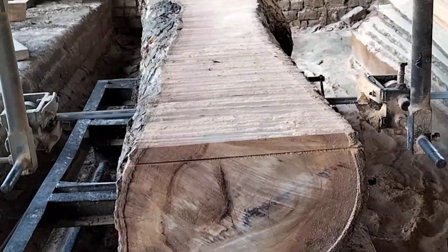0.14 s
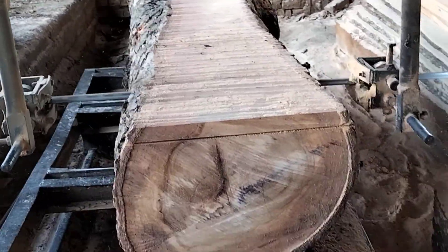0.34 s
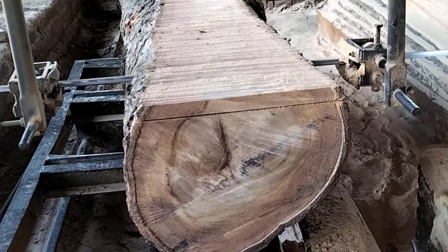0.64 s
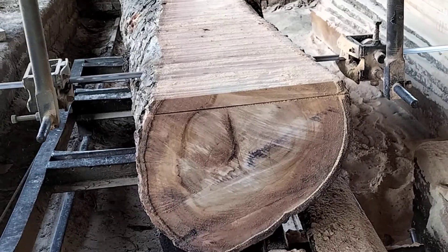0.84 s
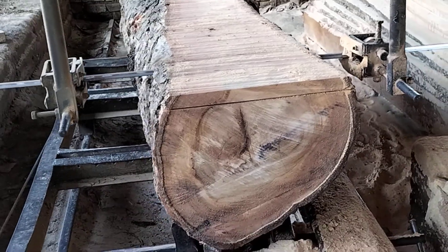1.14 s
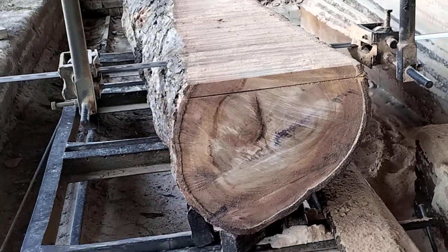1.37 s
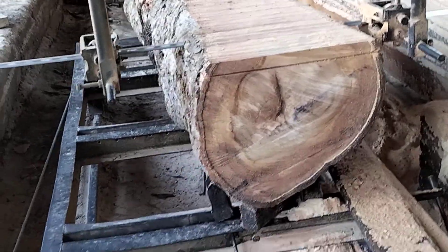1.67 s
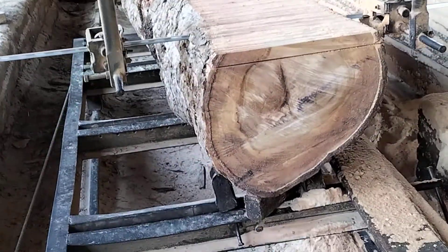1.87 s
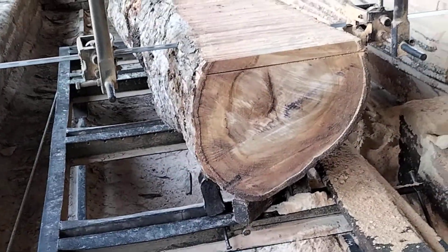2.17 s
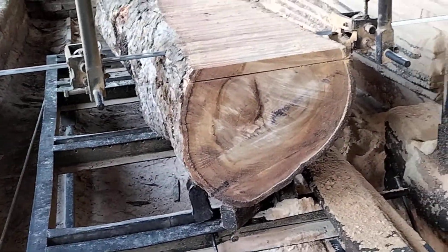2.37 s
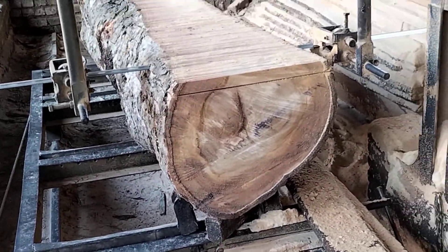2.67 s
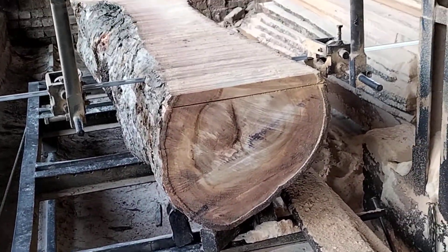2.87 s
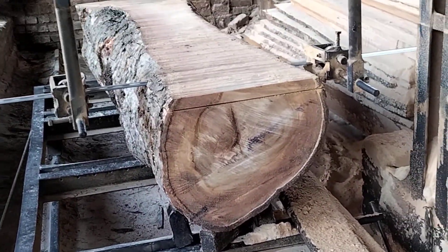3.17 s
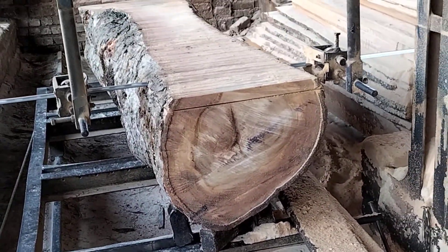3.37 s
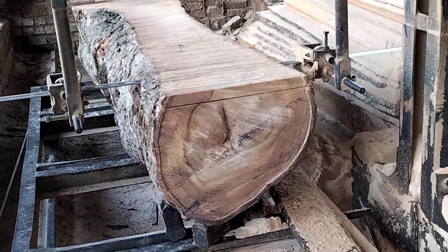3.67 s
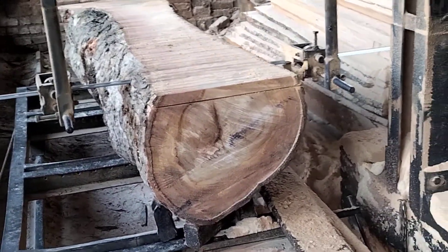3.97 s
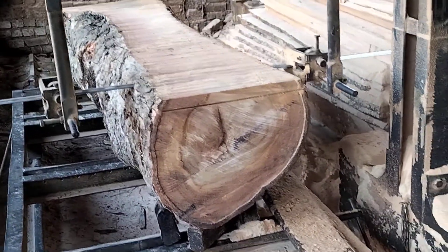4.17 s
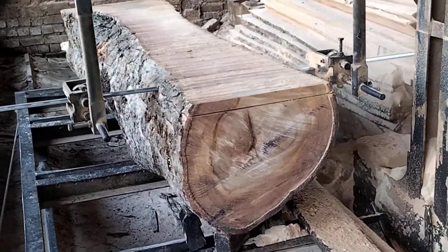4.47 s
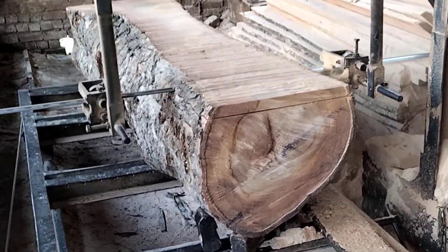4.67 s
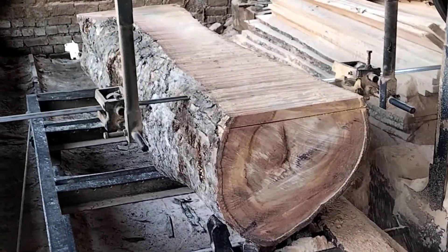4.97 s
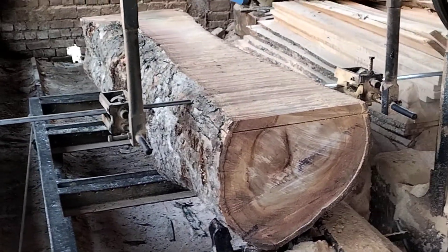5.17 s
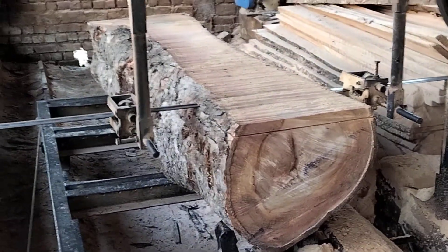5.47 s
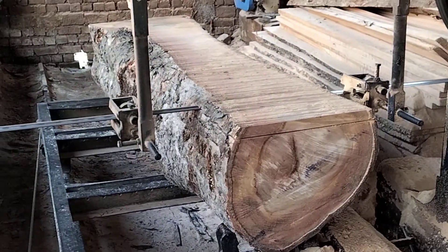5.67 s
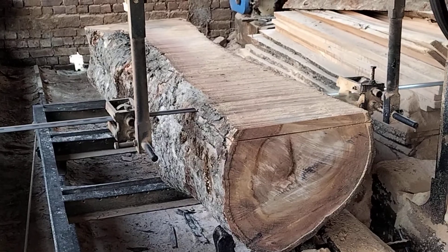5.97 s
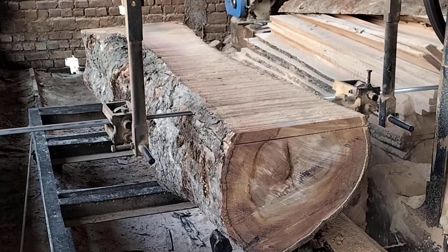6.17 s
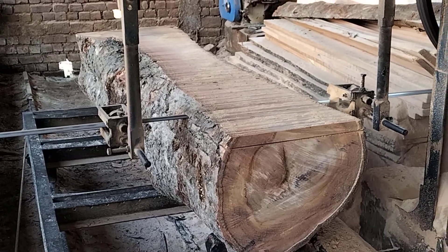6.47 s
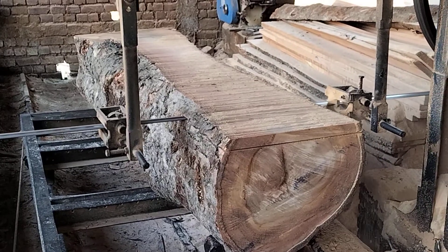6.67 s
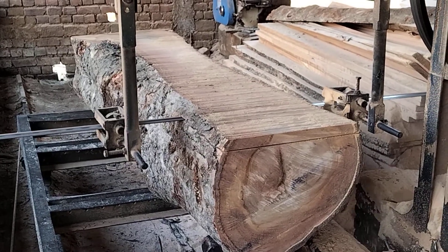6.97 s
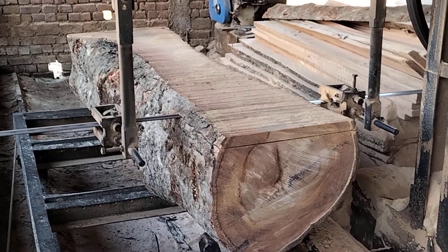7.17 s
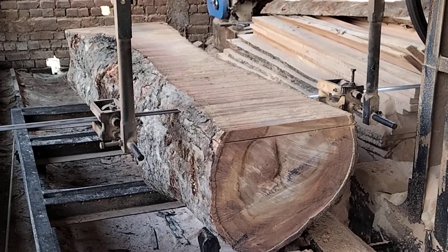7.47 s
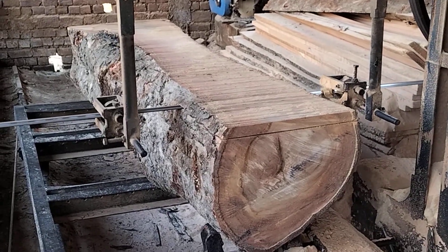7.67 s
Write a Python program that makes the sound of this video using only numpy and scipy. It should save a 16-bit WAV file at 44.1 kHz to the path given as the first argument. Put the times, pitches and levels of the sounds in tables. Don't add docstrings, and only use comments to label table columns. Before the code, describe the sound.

Close, dry sound of a running band saw cutting wood, heard from a few steps away on one hand-held microphone. The noise is already full at the start and never stops: rough tearing, metallic whine shifting in strength, airy hiss, low hum. Singing blade tones swell and fade; late on, a quick wooden clatter of several taps breaks through, and the sawing carries on to the end.

```python
import sys
import numpy as np
from scipy import signal
from scipy.io import wavfile

SR = 44100
rng = np.random.default_rng(int(sys.argv[2]) if len(sys.argv) > 2 else 0)


def int16_out(signal):
    q = np.round(np.clip(np.atleast_2d(signal).T, -1, 1) * 32767)
    wavfile.write(sys.argv[1], SR, q.astype(np.int16))


def convert_level_to_amplitude(level_db):
    exponent = np.asarray(level_db, float) / 20
    return 10 ** exponent


N = 344862


def rms_one(x):
    return x / np.sqrt(np.mean(x ** 2) + 1e-20)


def in_time(rows):
    s, *columns = np.transpose(rows)
    return [np.interp(np.arange(N) / SR, s, column) for column in columns]


def drift(rate):
    r = np.exp(-200 * np.pi * rate / SR)
    noise = rng.standard_normal(N // 100 + 1002)
    slow = signal.lfilter([1], [1, -2 * r, r * r], noise)[1000:]
    return np.interp(np.arange(N) / 100, np.arange(len(slow)), rms_one(slow - slow.mean()))


def resonate(x, hz, width):
    r = np.exp(-np.pi * width / SR)
    poles = [1, -2 * r * np.cos(2 * np.pi * hz / SR), r * r]
    return signal.lfilter([(1 - r * r) / 2, 0, (r * r - 1) / 2], poles, x)


def band_pass(x, order, low_hz, high_hz):
    return signal.sosfilt(signal.butter(order, [low_hz, high_hz], "band", fs=SR, output="sos"), x)


def elsewhere(x):
    return np.roll(x, rng.integers(N))


def family(force, low_hz, high_hz, width, fall_db, share_db, flutter_db, count=10):
    out = np.zeros(N)
    for place in np.linspace(0, 1, count):
        hz = np.sqrt(low_hz ** 2 + (high_hz ** 2 - low_hz ** 2) * place ** 1.31)
        wide = width * (0.76 + place)
        ring = resonate(resonate(elsewhere(force), hz, wide), hz, 0.99 * wide)
        flutter = flutter_db * (drift(2.9) + 0.63 * drift(8.2))
        out += ring * convert_level_to_amplitude(fall_db * abs(place - 0.15) + flutter)
    return convert_level_to_amplitude(share_db) * rms_one(out)


def banded(force, spectrum, low_hz, high_hz, patchy_db, count):
    hz, level_db = np.transpose(spectrum)
    edges, out = np.geomspace(low_hz, high_hz, count + 1), np.zeros(N)
    for low, high in zip(edges, edges[1:]):
        middle_db = np.interp(np.log(low * high) / 2, np.log(hz), level_db)
        patches = patchy_db * (drift(1.22) + 0.83 * drift(12.4))
        out += band_pass(elsewhere(force), 2, low, high) * convert_level_to_amplitude(middle_db + patches)
    return rms_one(out)


# time in seconds, view of the strip in dB.
VIEW = [(0, 2.5), (1.65, 3.5), (2.0, 2), (3.4, 0.5), (4.5, -2), (4.8, 1), (5.1, -3), (6.0, -2), (6.35, 0),
        (7.4, -5), (7.82, -2.5)]
# time in seconds, bite in dB.
BITE = [(0, 2), (0.55, 2), (1.1, 0.5), (1.75, -2), (2.15, 1), (2.9, -1), (3.25, 0.4), (3.6, -2.5),
        (4.35, -1.7), (4.85, -5), (5.25, 4), (6.0, 3), (6.55, -3), (6.85, -2), (7.15, 2.6), (7.45, 0),
        (7.82, 2.6)]
# time in seconds, bow in dB.
BOWING = [(0, -3), (0.35, 1.5), (0.62, 3.5), (0.95, 2), (1.3, 0.5), (1.7, -4.5), (2.0, 0), (2.45, 0.5),
          (2.8, -1.2), (3.15, -4.5), (4.05, 0.8), (4.3, -1), (4.75, -0.5), (5.0, 1.2), (5.9, 3), (6.3, 5),
          (7.0, -1), (7.5, -3.5)]
# time in seconds, freedom in dB.
FREEDOM = [(0, -1), (0.3, 1), (0.5, -2), (0.9, 1.5), (1.15, 0.5), (1.7, 1), (2.0, 0), (2.2, 0), (2.5, 0),
           (2.75, 0.5), (3.4, 0.5), (3.58, -2.5), (4.0, -1.5), (4.3, 0), (4.6, -1), (6.3, -0.5), (6.55, -2),
           (7.82, -1)]
LAYER_ANSWERS = {"twist": (-32, 0.26, -0.3, -0.22, -0.3), "first bend": (-28.5, 0.02, -0.1, 0.1, 1.56),
                 "second bend": (-33, 1.5, 0.1, -0.1, -0.1), "fourth bend": (-48.5, 0, -0.5, 0.05, 0.8),
                 "low modes": (-34.5, 1, -2.7, 1.7, 0.7), "middle modes": (-31, 0.45, 0.9, 1, -0.9),
                 "high modes": (-34.5, 1, 1.1, -0.14, -0.3), "squeal": (-28, -0.8, 0.7, -0.24, 1),
                 "rasp": (-28, -0.15, 0.1, -0.22, -0.09), "sawdust": (-31.5, -0.02, -0.11, 0.02, 0.07),
                 "guides": (-48.5, 0.56, 0.1, -0.1, -0.3), "frame": (-35.5, -0.2, -0.1, -0.22, -0.1)}


def level(name):
    mean_db, *shares = LAYER_ANSWERS[name]
    controls = [in_time(rows)[0] for rows in (VIEW, BITE, BOWING, FREEDOM)]
    return convert_level_to_amplitude(mean_db + np.dot(shares, controls))


def teeth(per_s, spread_db):
    hardness = np.minimum(rng.exponential(1, N), 5)
    sizes = convert_level_to_amplitude(spread_db * hardness) * rng.choice([-1, 1], N)
    return rms_one(sizes * (rng.random(N) < per_s / SR))


# frequency in Hz, density in dB per Hz.
RASP_SPECTRUM = [(24, -70), (40, -37), (175, -10), (246, -4), (318, -9.5), (556, -10), (916, -7.5),
                 (1120, -10.5), (1630, -4.5), (1800, -8.5), (2070, 0), (2640, 0.5), (3930, -3),
                 (4430, -35.5), (4700, -14), (6110, -54), (10300, -120)]
# lowest in Hz, highest in Hz, width of a mode in Hz,
# fall over the family in dB, share in dB, flutter in dB.
PLATE_MODES = (2955.5, 4160.5, 27, -2.5, -6, 4.5)


def rasp(force):
    torn = convert_level_to_amplitude(3.5) * banded(force, RASP_SPECTRUM, 45.5, 4720, patchy_db=0.94, count=32)
    return level("rasp") * (torn + family(force, *PLATE_MODES, count=22))


# lowest in Hz, highest in Hz,
# width of a mode in Hz, fall over the family in dB, share in dB, flutter in dB.
STRIP_FAMILIES = [(977, 1300, 58, 4, -2.5, 2.5), (1770, 1950, 35, -8.5, 1, 3),
                  (4835, 5400, 88, -6, -1, 2.6), (14500, 16100, 330, -.5, 2.5, 1.1)]


def strip(force):
    names = ["twist", "first bend", "second bend", "fourth bend"]
    return sum(level(name) * family(force, *row) for name, row in zip(names, STRIP_FAMILIES))


# lowest in Hz, highest in Hz,
# width of a mode in Hz, fall over the family in dB, share in dB, flutter in dB.
SPAN_FAMILIES = [(1349, 1640, 37, -2, -8.5, -1), (1993, 2270, 20, -8.5, -5, 2.5),
                 (5490, 5980, 410, 0, -1.5, 1.5)]


def span(force):
    names = ["low modes", "middle modes", "high modes"]
    return sum(level(name) * family(force, *row, count=7) for name, row in zip(names, SPAN_FAMILIES))


def moving_resonance(force, centre_hz, width):
    slow = signal.butter(2, width / 2, fs=SR, output="sos")
    along, across = (signal.sosfilt(slow, elsewhere(force)) for part in "ab")
    phase = 2 * np.pi * np.cumsum(centre_hz) / SR
    return rms_one(along * np.cos(phase) + across * np.sin(phase))


# width in Hz, share in dB.
SQUEAL_PARTS = [(90, -9.5), (300, -4)]


def squeal(force):
    start_hz, settled_hz, settle_s, sag_hz_per_db = 2430, 2642, 0.9, 16
    settling = np.exp(-np.arange(N) / SR / settle_s)
    pitch_hz = settled_hz + (start_hz - settled_hz) * settling - sag_hz_per_db * in_time(BITE)[0]
    out = np.zeros(N)
    for width, share_db in SQUEAL_PARTS:
        swell = convert_level_to_amplitude(share_db + 1.6 * drift(10.0))
        out += swell * moving_resonance(force, pitch_hz + 45 * drift(5), width)
    return level("squeal") * out


# middle in seconds, frequency in Hz, level in dB, half length in seconds.
SINGING_MODES = [(0.068, 2430.0, -32, 0.15), (0.142, 3880.0, -38, 0.2), (0.2, 1135.0, -39.5, 0.63),
                 (0.3, 2400.0, -32, 0.3), (0.4, 5000.0, -36.0, 0.09), (0.43, 3190.0, -35.5, 0.15),
                 (0.55, 2060.0, -28, 0.093), (0.64, 2670.0, -30.5, 0.08), (0.667, 2020.0, -28.5, 0.31),
                 (1.04, 3190.0, -38, 0.38), (1.096, 2670.0, -34.5, 0.13), (1.28, 2130.0, -30.5, 0.16),
                 (1.56, 2690.0, -31.5, 0.16), (1.58, 3500.0, -32.5, 0.17), (1.745, 1790.0, -27, 0.054),
                 (2.1, 2610.0, -31, 0.16), (2.25, 4970.0, -36, 0.14), (2.3, 2760.0, -30.5, 0.099),
                 (2.563, 1810.0, -29, 0.2), (3.097, 1830.0, -34, 0.69), (3.324, 2280.0, -36.5, 0.24),
                 (3.758, 1830.0, -35, 0.36), (4.82, 1330.0, -38, 0.12), (5.356, 2630.0, -34, 0.59),
                 (5.665, 2540.0, -29, 0.12), (6.063, 2610.0, -28, 0.17), (6.145, 2240.0, -32.0, 0.17),
                 (6.41, 1755, -36, 0.1), (7.361, 1135.0, -37, 0.12), (7.58, 2630.0, -32.5, 0.16)]


def streaks():
    out, t = np.zeros(N), np.arange(N) / SR
    waver, tremble = np.cumsum(drift(13.25)) / SR, convert_level_to_amplitude(5.15 * drift(23))
    for s, hz, db, length in SINGING_MODES:
        near = slice(max(round((s - length) * SR), 0), round((s + length) * SR))
        swell = np.cos(np.pi / 2 * (t[near] - s) / length) ** 2
        tone = np.sin(2 * np.pi * (hz * t[near] + 18 * elsewhere(waver)[near]))
        out[near] += convert_level_to_amplitude(db + 4.5) * swell * elsewhere(tremble)[near] * tone
    return out


# frequency in Hz, density in dB per Hz.
DUST_SPECTRUM = [(2530, -36), (4300, 1.5), (4570, 0.5), (4990, 0), (6450, -2), (7140, 3), (8040, -6),
                 (9250, -21.5), (9700, -22), (12600, -56), (21300, -120)]


def sawdust(force):
    hiss = banded(force, DUST_SPECTRUM, 4264, 9720, patchy_db=0.66, count=16)
    return level("sawdust") * convert_level_to_amplitude(2.0) * hiss


# frequency in Hz, density in dB per Hz.
GUIDE_SPECTRUM = [(5470, -36), (9300, -11.5), (10100, 2), (11100, -3), (11900, 3), (13200, -6), (13800, -5),
                  (14600, 1)]


def guides(force):
    chatter = convert_level_to_amplitude(0.52 * drift(19))
    sizzle = banded(force, GUIDE_SPECTRUM, 9580, 14740, patchy_db=-1.5, count=14)
    return level("guides") * convert_level_to_amplitude(1.54) * chatter * sizzle


# time in seconds, peak in dB.
BOUNCES = [
    (7.436, -23.5),
    (7.445, -19),
    (7.452, -17),
    (7.466, -21.5),
    (7.478, -23),
]
# frequency in Hz, level in dB, time to fall by 60 dB in seconds.
BOARD_MODES = [(278, -1, 0.098), (364, -11, 0.065), (463, -6, 0.078), (564, -12, 0.05), (643, 2, 0.078),
               (710, -3.5, 0.08), (798, 6.5, 0.059), (935, -1, 0.067), (1064, 0, 0.086)]


def board():
    at, out = [round(s * SR) for s, db in BOUNCES], np.zeros(N)
    peaks_db = np.array(BOUNCES)[:, 1]
    for hz, level_db, t60 in BOARD_MODES:
        clicks = np.full(N, 1e-18)
        strengths = convert_level_to_amplitude(peaks_db + level_db - 7.5 + rng.normal(0, 2.2, len(at)))
        clicks[at] = strengths * rng.choice([-1, 1], len(at))
        r, w = convert_level_to_amplitude(-60 / (t60 * SR)), 2 * np.pi * hz / SR
        out += signal.lfilter([0, np.sin(w)], [1, -2 * r * np.cos(w), r * r], clicks)
    return signal.sosfilt(signal.butter(4, 190, "high", fs=SR, output="sos"), out)


# frequency in Hz, width in Hz, level in dB.
FRAME_PANELS = [(137.5, 13.5, -13.5), (155.4, 17, -11), (210, 31, -26.5), (243.4, 31, 1), (356.8, 21, -8)]


def frame(force):
    wheel_hz = 11.8
    turns = np.cumsum(wheel_hz * (1 + 0.01994 * drift(1.192)) / SR)
    thumps = rms_one(np.diff(np.floor(turns), prepend=0))
    shake = force + 0.43 * thumps
    rings = (convert_level_to_amplitude(db) * resonate(resonate(shake, hz, width), hz, 2.5 * width) for hz, width, db in FRAME_PANELS)
    return level("frame") * rms_one(sum(rings))


# middle in seconds, level in dB.
AIR_PUFFS = [
    (0.05, -64),
    (1.05, -72),
    (2.6, -71),
    (3.64, -68),
    (4.83, -65),
    (6.72, -71),
    (7.65, -70),
]


def draught():
    still_db, puff_s = -79, 0.13
    t = np.arange(N) / SR
    swells = sum(convert_level_to_amplitude(db) * np.exp(-((t - s) / puff_s) ** 2) for s, db in AIR_PUFFS)
    rumble = rms_one(band_pass(rng.standard_normal(N), 2, 27, 55))
    return convert_level_to_amplitude(-2.0) * (convert_level_to_amplitude(still_db) + swells) * rumble


def scene():
    force = teeth(9000, spread_db=2.5)
    shudder = convert_level_to_amplitude(0.48 * drift(10.5))
    saw = rasp(force) + strip(force) + span(force) + squeal(force) + sawdust(force) + guides(force)
    mono = shudder * saw + streaks() + board() + frame(elsewhere(force)) + draught()
    return np.array([mono, mono])


# middle in seconds, lowest in Hz, highest in Hz.
SIDE_PATCHES = [
    (1.247, 6850, 8900),
    (1.387, 8950, 11700),
    (4.684, 8950, 10350),
    (5.451, 4150, 5150),
    (5.520, 4650, 5700),
    (6.519, 4650, 6200),
    (6.681, 7580, 8950),
    (6.797, 6900, 8270),
    (7.006, 8270, 11000),
    (7.238, 5520, 6900),
]


def side_noise(mono):
    side, other = np.zeros(N), elsewhere(mono)
    arch = np.sin(np.pi * np.arange(2048) / 2048) ** 2
    for s, low, high in SIDE_PATCHES:
        at = slice(round(s * SR) - 1024, round(s * SR) + 1024)
        side[at] += convert_level_to_amplitude(-3.0) * arch * band_pass(other[at], 6, low, high)
    return side


def top_cut(x):
    return signal.sosfilt(signal.butter(12, 15520, fs=SR, output="sos"), x)


def record(dry):
    mix = dry + side_noise(dry[0]) * [[1], [-1]]
    return top_cut(mix)


dry = scene()
out = record(dry)
int16_out(out)
```